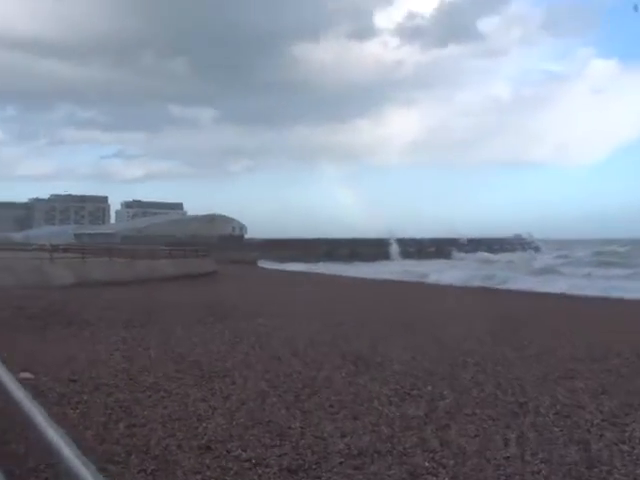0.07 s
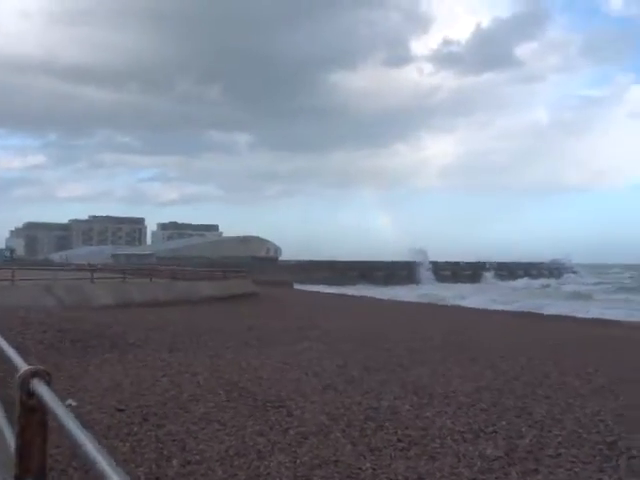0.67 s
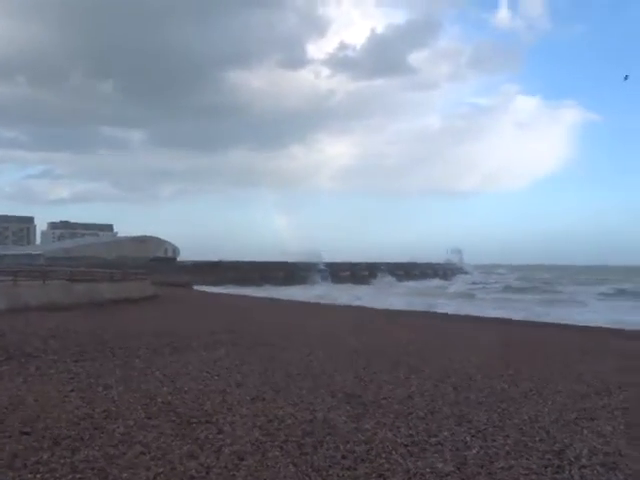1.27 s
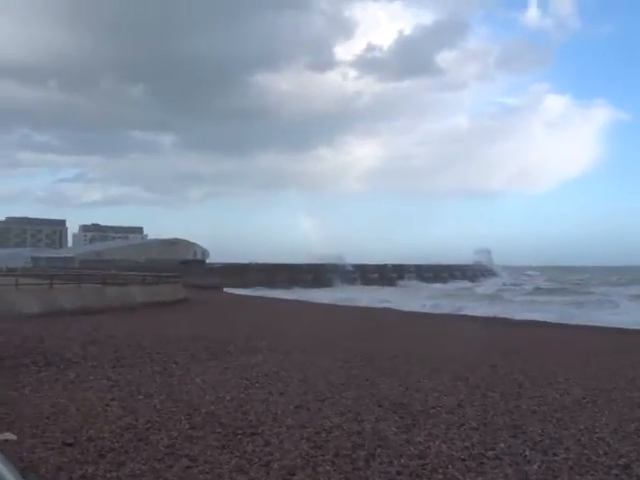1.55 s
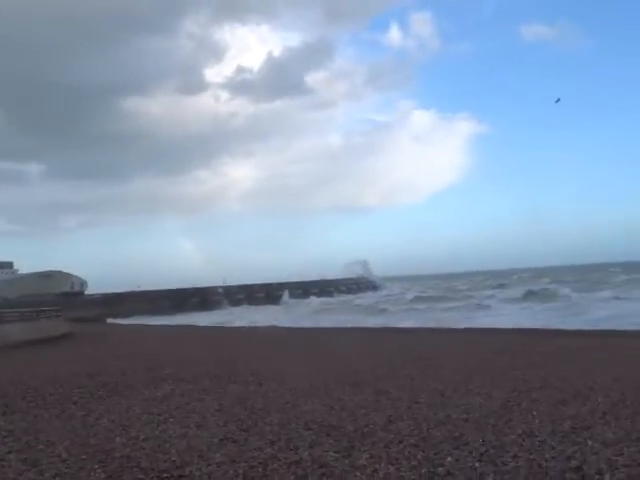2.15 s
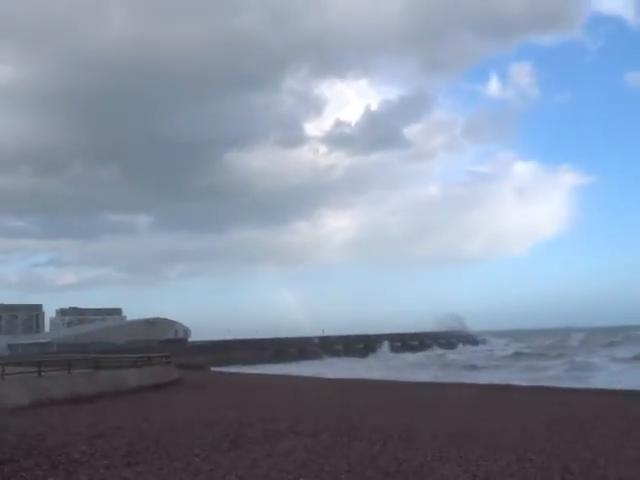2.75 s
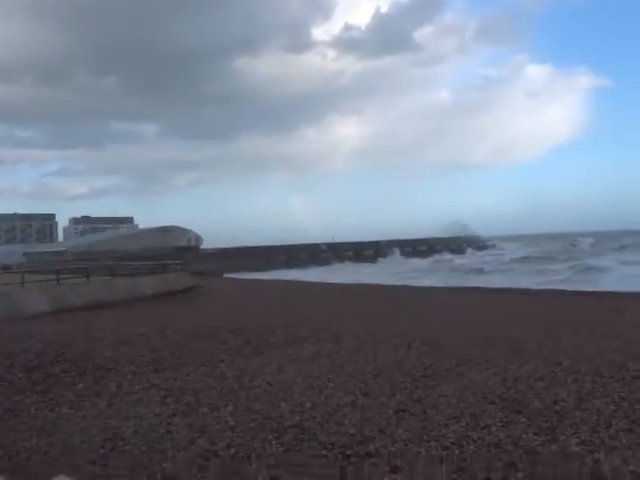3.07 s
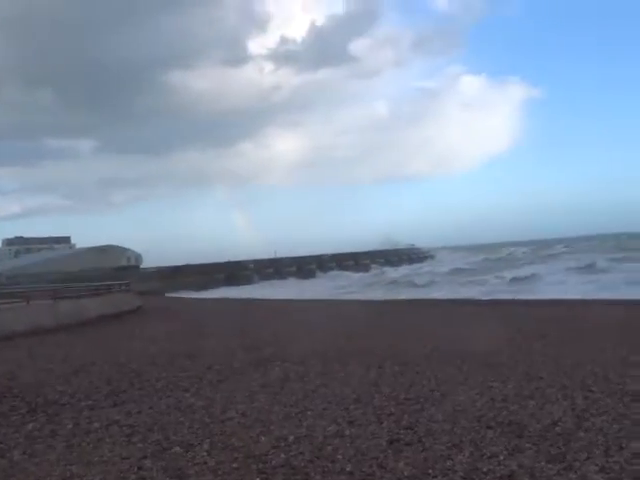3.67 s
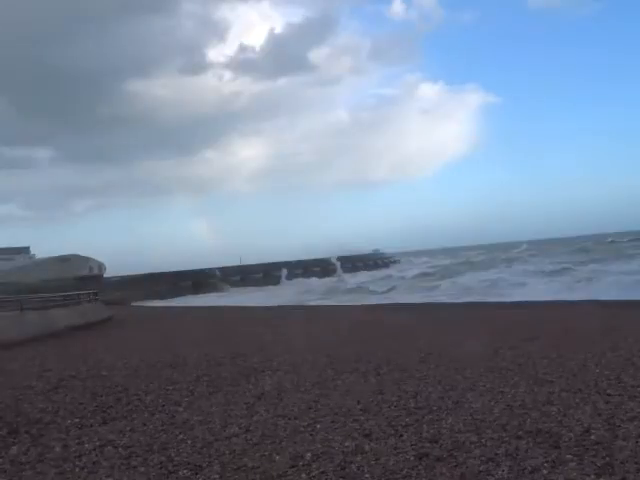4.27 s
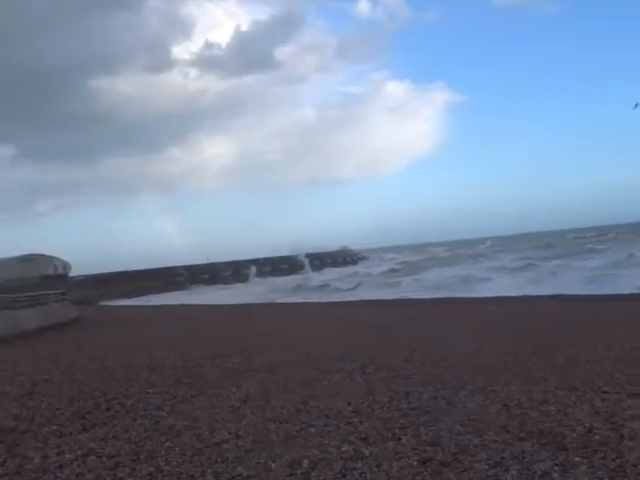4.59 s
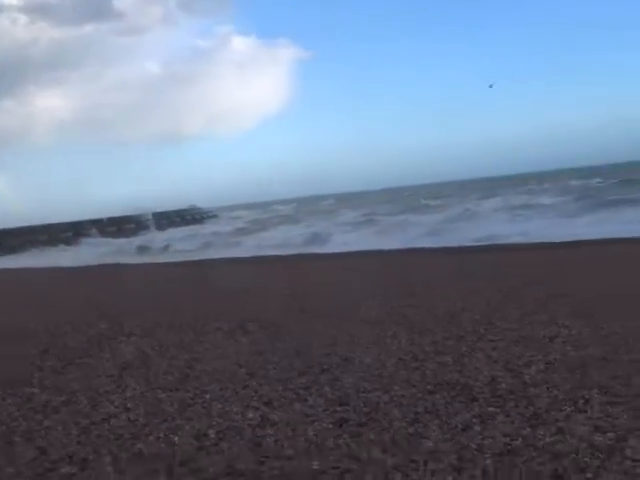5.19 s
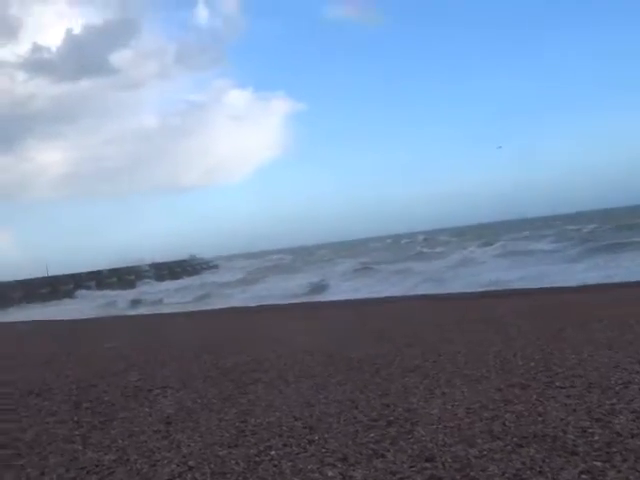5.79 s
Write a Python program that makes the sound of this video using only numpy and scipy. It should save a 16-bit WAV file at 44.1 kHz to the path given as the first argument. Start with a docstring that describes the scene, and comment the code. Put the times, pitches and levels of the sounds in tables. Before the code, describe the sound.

A gale rumbles and hisses against the microphone on a pebble beach, with waves washing far behind it.

```python
"""Gale on a pebble beach

Eddies buffet the two microphone ports of a hand-held camera with a deep roar that swells and glides.
One wind strength drives the rush, spurts and lesser rips and snaps: the finer the eddies, the faster
they grow with it, so each gust brightens and tears into hiss and crackle at the casing. One long surge
swells near the end, surf washes far behind the wind, and a quick gain control holds the level."""
import sys
import numpy as np
from scipy.fft import rfft, irfft, next_fast_len
from scipy.io import wavfile
from scipy.ndimage import uniform_filter1d, map_coordinates

SR = 44100
rng = np.random.default_rng(int(sys.argv[2]) if len(sys.argv) > 2 else 0)


def master(y):
    """Save y as 16-bit WAV."""
    cut = np.clip(np.atleast_2d(y).T, -1, 1)
    pcm = np.round(cut * 32767)  # scale
    wavfile.write(sys.argv[1], SR, pcm.astype(np.int16))


N = 265923

# stereo width, how much the two ports differ: frequency_hz, side_minus_mid_db
PORT_WIDTH = [(60, -21), (110, -15), (190, -10), (340, -8), (610, -4), (1090, -3), (1940, -5), (3460, -7),
              (6160, -8), (11000, -16.5)]


def amp(db):
    """Decibels to gain."""
    return 10 ** (np.asarray(db) / 20)


def unit(x):
    """x at rms 1."""
    return x / np.sqrt(np.mean(x ** 2) + 1e-20)


def db_at(spectrum, hz):
    """Read (frequency_hz, level_db) points on a log frequency axis."""
    points_hz, points_db = np.transpose(spectrum)
    return np.interp(np.log(hz + 1), np.log(points_hz + 1), points_db)


def envelope(points):
    """Join (time_s, value) points into one value per sample."""
    times, values = np.transpose(points)
    return np.interp(np.arange(N) / SR, times, values)


def wobble(rate_hz):
    """A smooth random curve with rate_hz knots a second."""
    knots = rng.standard_normal(int(N * rate_hz / SR) + 4)
    return map_coordinates(knots, [np.arange(N) * rate_hz / SR])


def filtered(x, response):
    """Equalise x with a gain given as a function of frequency."""
    size = next_fast_len(N + SR // 2)
    return irfft(rfft(x, size) * response(np.fft.rfftfreq(size, 1 / SR)), size)[..., :N]


def running_rms(x, seconds):
    """Smoothed level of all channels together."""
    size = max(int(seconds * SR), 2)
    power = uniform_filter1d(np.mean(x ** 2, axis=0), size)
    return np.sqrt(np.abs(uniform_filter1d(power, size)) + 1e-12)


def spread(pair):
    """Mix two unrelated signals, as mid and side, into the left and right ports."""
    mid, side = pair[0], filtered(pair[1], lambda hz: amp(db_at(PORT_WIDTH, hz)))
    return np.array([mid + side, mid - side])


def at_ports(pair, spectrum):
    """Colour two unrelated signals and spread them over the ports."""
    return spread(filtered(pair, lambda hz: amp(db_at(spectrum, hz))))


def turbulence(spectrum, gain=1):
    """Stereo pressure noise, shaped by gain, then coloured and brought to rms 1."""
    return unit(at_ports(rng.standard_normal((2, N)) * gain, spectrum))


def wind_strength():
    """Slow gusts with short flares, lulls and a quick flurry on top, in dB."""
    # slow rise and fall of the wind: time_s, strength_db
    gusts = [(0, -6.5), (.3, -3.9), (.57, -4), (.9, -7.5), (1.22, -6), (1.33, -0.5), (1.54, -2),
             (1.7, -4.8), (2.03, -2), (2.33, -8), (2.7, -4), (3.0, -2), (3.14, -3.5), (3.23, -10.5),
             (3.72, -6.5), (3.87, -8.5), (4.15, -6.5), (4.47, -2), (4.72, -6.5), (4.87, -3.6), (5.2, 0.5),
             (5.85, -5), (6.03, -3.2)]
    # brief flares and lulls: centre_s, half_length_s, extra_strength_db
    flares = [(0.034, 0.018, -9.5), (0.161, 0.037, -2.5), (0.552, 0.035, 2.5), (0.79, .02, 1.5),
              (0.84, .015, -1), (0.892, 0.018, -1.5), (0.957, .022, -4.5), (1.36, 0.042, 2),
              (1.536, .025, 2), (1.728, 0.013, 4), (1.778, 0.049, -5.5), (1.834, 0.012, 6),
              (1.87, 0.011, -3), (1.912, .014, 2), (2.145, .018, 0), (2.191, 0.0096, 5.5),
              (2.28, .028, -3.5), (2.374, 0.026, 5), (2.435, 0.027, -3), (2.497, 0.03, 3.5),
              (2.659, 0.032, 3), (2.783, 0.011, 4.5), (2.845, .018, -2), (3.009, 0.035, 4.5),
              (3.32, 0.02, 7.5), (3.387, .018, 8), (3.448, 0.054, -3), (3.86, 0.057, -2), (4.08, .07, 0),
              (4.32, 0.061, 2), (4.668, 0.022, -1.5), (4.727, .018, -4.5), (4.76, 0.013, 2.5),
              (4.88, 0.023, 1.5), (5.569, 0.032, -0.5)]
    t = np.arange(N) / SR
    flares_db = sum(db * np.exp(-((t - centre_s) / half_s) ** 2) for centre_s, half_s, db in flares)
    flurry_db = 0.75 * wobble(rate_hz=25)
    return envelope(gusts) + flares_db + flurry_db


def buffet(lump_db, heave_db):
    """Large eddies press on both ports: a lumpy roar over a deep, heaving rumble."""
    # tone of the roar: frequency_hz, level_db
    roar_spectrum = [(30, -28), (70, -17), (110, -7), (150, 0.5), (200, 0.5), (250, 0), (320, 0.4),
                     (480, -6), (750, -19), (1200, -32.5), (2500, -80), (6000, -120)]
    # level ride of the roar: time_s, level_db
    roar_levels = [(0, -16.5), (.38, -18), (1.1, -17), (1.35, -16), (1.8, -19), (2.02, -17), (2.28, -17.5),
                   (2.7, -15.5), (3.2, -18.5), (3.6, -18), (3.9, -18), (4.35, -19), (5.15, -16),
                   (6.03, -17.5)]
    # tone of the rumble, the largest eddies: frequency_hz, level_db
    rumble_spectrum = [(15, -21), (28, -10.5), (42, -2.5), (55, 1), (75, 6), (115, 9.5), (150, 2.5),
                       (220, -4), (400, -44), (1500, -120)]
    # level ride of the rumble: time_s, level_db
    rumble_levels = [(0, -29), (.28, -26), (.6, -27), (.92, -27.5), (1.25, -27), (1.65, -26), (2.2, -29.5),
                     (2.55, -28.5), (3.1, -30), (3.28, -27.5), (3.87, -31.5), (4.33, -24), (4.6, -30.5),
                     (6.03, -30.5)]
    roar_db = envelope(roar_levels) + lump_db * wobble(rate_hz=10)
    rumble_db = envelope(rumble_levels) + heave_db * wobble(rate_hz=5.4)
    roar, rumble = turbulence(roar_spectrum), turbulence(rumble_spectrum)
    steady_roar = roar / running_rms(roar, seconds=0.043)
    steady_rumble = rumble / running_rms(rumble, seconds=0.19)
    return amp(roar_db) * steady_roar + amp(rumble_db) * steady_rumble


def swells(relative_bandwidth):
    """Eddies shed by the casing roar in a narrow band that glides as the flow speeds up or slackens."""
    # hollow swells of the roar: crest_s, half_length_s, pitch_hz, glide_octaves_per_s, level_db
    hollow_swells = [(0.243, 0.14, 160, 0.11, -19.5), (0.448, 0.11, 300, 1.78, -16),
                     (.86, 0.12, 150, -2.2, -21.5), (1.349, 0.067, 430, -0.2, -21),
                     (1.496, 0.089, 240, -2, -21.5), (2.55, 0.13, 180, -1.2, -20),
                     (2.827, .15, 295, -0.026, -25.5), (3.04, 0.12, 152, -.7, -22),
                     (3.823, 0.086, 313, 0, -22.5), (4.627, 0.057, 330, 2, -20.5),
                     (5.12, 0.23, 247.7, 1.14, -19.5), (5.748, 0.15, 240, -0.55, -24.5),
                     (5.962, 0.065, 380, 2, -18)]
    t = np.arange(N) / SR
    pair = np.zeros((2, N))
    for crest_s, half_s, pitch_hz, glide, level_db in hollow_swells:
        near = np.abs(t - crest_s) < 2.5 * half_s
        from_crest_s = t[near] - crest_s
        cycles = np.cumsum(pitch_hz * 2 ** (glide * from_crest_s)) / SR
        # random drift in level and phase smears the gliding tone into a band of noise
        knots = rng.standard_normal((4, SR // 50))
        drift = np.array([map_coordinates(k, [cycles * relative_bandwidth], mode="mirror")
                          for k in knots])
        band = drift[:2] * np.cos(2 * np.pi * cycles) + drift[2:] * np.sin(2 * np.pi * cycles)
        fade = np.exp(-(from_crest_s / half_s) ** 2)
        pair[:, near] += amp(level_db) * fade * band / running_rms(band[:1], seconds=0.052)
    return spread(pair)


def rush(strength_db, eddies, flutter_db):
    """Smaller eddies give a throaty rush that flutters as each one passes."""
    # tone of the rush: frequency_hz, level_db
    rush_spectrum = [(120, -34), (230, -0.5), (330, -2.5), (520, 0), (800, -4), (1100, -9.5), (1500, -15.5),
                     (2100, -26.5), (3200, -42.5), (6000, -63), (11000, -120)]
    air = turbulence(rush_spectrum) * amp(flutter_db * eddies)
    level_db = -18.5 + 0.44 * strength_db
    return amp(level_db) * air / running_rms(air, seconds=0.075)


def surge(crest_s, rise_s, fall_s, level_db):
    """One long, hollow swell of the roar rises to a crest and ebbs."""
    # tone of the surge: frequency_hz, level_db
    surge_spectrum = [(150, -13), (280, -3), (520, 3), (900, -6), (1500, -16), (3000, -36.5), (8000, -90)]
    from_crest_s = np.arange(N) / SR - crest_s
    fade = np.exp(-(from_crest_s / np.where(from_crest_s < 0, rise_s, fall_s)) ** 2)
    return amp(level_db) * fade * turbulence(surge_spectrum)


def spurts(strength_db, eddies, flutter_db, grain_db):
    """Flow tears off the casing in soft spurts a millisecond or two long, bunched under the eddies."""
    # tone of the hiss: frequency_hz, level_db
    hiss_spectrum = [(500, -23), (1200, 2.5), (2000, 5.5), (3300, -0.5), (4500, -6), (6000, -12.5),
                     (8000, -25), (11000, -25)]
    # bright fizz of the finest eddies, heard in hard gusts: frequency_hz, level_db
    fizz_spectrum = [(2500, -26), (4500, 4), (5500, -1.5), (6700, 5), (8200, 0.5), (11000, -13),
                     (13000, -41)]
    grain = np.tanh(0.61 * wobble(rate_hz=800)) / 0.61  # rounded peaks keep the spurts soft
    tearing = amp(flutter_db * eddies + grain_db * grain)
    tearing = tearing / running_rms(tearing[None], seconds=0.11)
    hiss = amp(-36 + 1.02 * strength_db) * turbulence(hiss_spectrum, gain=tearing)
    fizz = amp(-51 + 2.55 * strength_db) * turbulence(fizz_spectrum, gain=tearing)
    return hiss + fizz


def rip(half_s, centre_hz, half_width_octaves=0.75, size=4096):
    """One short tear of band-passed noise, of about rms 1 at its crest."""
    fade = np.exp(-((np.arange(size) - size / 2) / SR / half_s) ** 2)
    octaves_off = np.log2((np.fft.rfftfreq(size, 1 / SR) + 1) / centre_hz)
    band = np.exp(-(octaves_off / half_width_octaves) ** 2)
    burst = rng.standard_normal((2, size)) * fade
    return unit(irfft(rfft(burst) * band)) * np.sqrt(np.mean(fade ** 2))


def rips(strength_db, per_second, scatter_db, scatter_octaves):
    """Single eddies rip past the casing, each with its own colour: a crackle that rises in the gusts."""
    # hardest rips of air: crest_s, half_length_s, centre_hz, level_db
    hard_rips = [(.07, .004, 3500, -46), (.1297, .0015, 6000, -48), (.298, .003, 6500, -46),
                 (.345, .016, 2500, -39.5), (.4908, .0015, 5000, -43), (.505, .004, 3500, -41),
                 (.6025, .0015, 5500, -43), (.7499, .0012, 6000, -43), (.8054, .0015, 5000, -43),
                 (.882, .007, 2700, -41.5), (1.0338, .0012, 5000, -46), (1.1958, .0015, 5000, -45),
                 (1.38, .003, 4500, -38), (1.6333, .002, 6000, -38.5), (1.8436, .003, 6000, -42),
                 (2.013, .0015, 2500, -32), (2.086, .002, 6000, -42), (2.1722, .002, 4700, -38),
                 (2.2156, .002, 4700, -39), (2.2659, .0015, 6000, -47), (2.4023, .0015, 5000, -44),
                 (2.643, .0015, 6000, -42), (2.7908, .0015, 5500, -43), (3.012, .025, 3000, -40),
                 (3.2727, .002, 5500, -46), (3.7621, .0015, 4700, -42), (4.2806, .003, 5000, -41),
                 (4.3042, .0015, 6000, -39), (4.4267, .003, 5500, -42), (4.7762, .0015, 5000, -45),
                 (4.8895, .0015, 6000, -40), (5.0193, .0015, 7000, -41), (5.335, .008, 8000, -45),
                 (5.5664, .0015, 6000, -42), (5.8405, .0012, 5500, -43), (5.8495, .0012, 5500, -42)]
    # the ports dull the top of every rip: frequency_hz, gain_db
    dulling = [(6800, 0), (8200, -7), (11000, -10)]
    times = rng.uniform(0, (N - 1) / SR, int(per_second * N / SR))
    lesser_rips = []
    for crest_s, (colour, force) in zip(times, rng.standard_normal((len(times), 2))):
        half_s, centre_hz = 0.0012, 5200 * 2 ** (scatter_octaves * colour)
        level_db = -48 + 1.3 * strength_db[int(crest_s * SR)] + scatter_db * force
        lesser_rips.append((crest_s, half_s, centre_hz, level_db))
    pair = np.zeros((2, N + 2 * SR))  # a spare second at each end
    for crest_s, half_s, centre_hz, level_db in hard_rips + lesser_rips:
        burst = amp(level_db) * rip(half_s, centre_hz)
        length = burst.shape[1]
        start = SR + round(crest_s * SR) - length // 2
        pair[:, start:start + length] += burst
    return at_ports(pair[:, SR:SR + N], dulling)


def snaps(strength_db, per_second, scatter_db, stutter_s, stutter_loss_db):
    """Slaps of air tick sharply: hard ones that stutter, and lesser ones that grow with the wind."""
    # sharpest snaps at the ports: start_s, level_db
    hard_snaps = [(.306, -22), (.3393, -15), (.389, -18.5), (1.18, -23), (1.251, -22), (1.4863, -16.5),
                  (1.724, -18.5), (2.249, -24.5), (3.198, -26), (3.3445, -21), (4.2055, -20),
                  (4.481, -16.5), (4.4845, -17), (4.5063, -13.5), (4.511, -17), (4.625, -22), (4.817, -18),
                  (4.9705, -18.5), (4.9876, -15), (5.3313, -14), (5.603, -20)]
    # tone of a snap: frequency_hz, gain_db
    snap_spectrum = [(400, -4.5), (1500, 4), (3500, 1.5), (7000, -1.5), (11000, -5.5)]
    lesser_hits = rng.random(N) < per_second / SR
    slaps = lesser_hits * amp(-33 + 1.5 * strength_db + scatter_db * rng.standard_normal(N))
    for start_s, level_db in hard_snaps:
        gaps_s = stutter_s * rng.uniform(0.5, 1.5, 2)
        for repeat, delay_s in enumerate([0, *np.cumsum(gaps_s)]):
            slaps[round((start_s + delay_s) * SR)] += amp(level_db - stutter_loss_db * repeat)
    polarity = np.sign(rng.standard_normal((2, N)))
    return at_ports(slaps * polarity, snap_spectrum)


def surf(level_db, swell_db):
    """Distant breakers on the shingle merge into a slowly swelling wash."""
    # tone of the far wash: frequency_hz, level_db
    surf_spectrum = [(60, -27), (250, 22), (600, 10), (1500, -6.5), (3000, -12), (6000, -43), (11000, -48)]
    return amp(level_db + swell_db * wobble(rate_hz=0.59)) * turbulence(surf_spectrum)


def scene():
    """Wind over far surf; one wind strength and the same passing eddies drive the rush and the spurts."""
    strength_db = wind_strength()
    eddies = unit(wobble(rate_hz=200) + 0.5 * wobble(rate_hz=55))
    wind = buffet(lump_db=1.0, heave_db=0.5) + swells(relative_bandwidth=0.3)
    wind += rush(strength_db, eddies, flutter_db=2.5)
    wind += spurts(strength_db, eddies, flutter_db=0.7, grain_db=5)
    wind += rips(strength_db, per_second=60, scatter_db=2.6, scatter_octaves=0.45)
    wind += snaps(strength_db, per_second=18, scatter_db=2.6, stutter_s=0.002, stutter_loss_db=7.5)
    wind += surge(crest_s=5.224, rise_s=0.24, fall_s=0.37, level_db=-15)
    return wind + surf(level_db=-37.0, swell_db=1)


def gain_control(x, knee_db, seconds):
    """Turns the sound down smoothly as its level nears the knee."""
    drive = running_rms(x, seconds) / amp(knee_db)
    return x / (1 + drive ** 4) ** (1 / 4)


def record(dry):
    """The camera rides the loudest lumps and keeps nothing above its band limit."""
    held = gain_control(dry, knee_db=-13.0, seconds=0.0095)
    return filtered(held, lambda hz: hz < 11150)


dry = scene()
out = record(dry)
master(out)
```